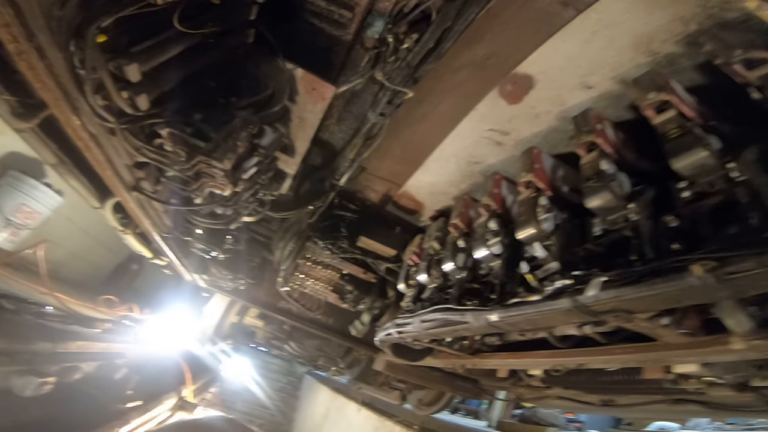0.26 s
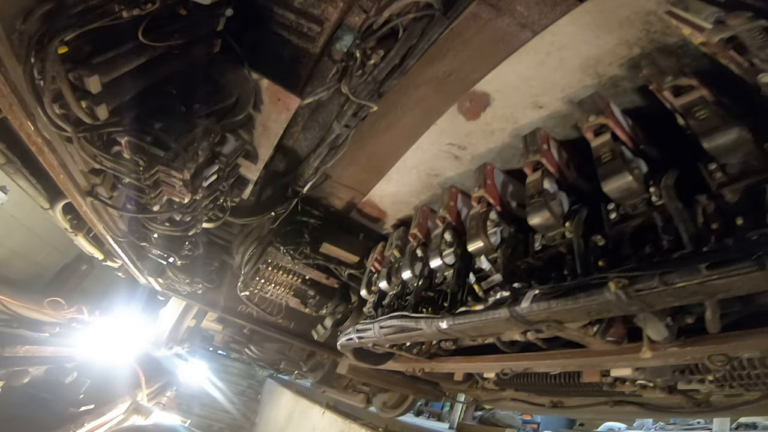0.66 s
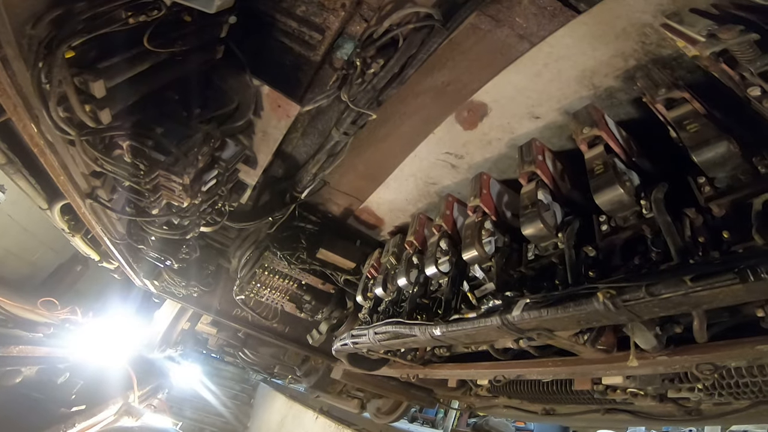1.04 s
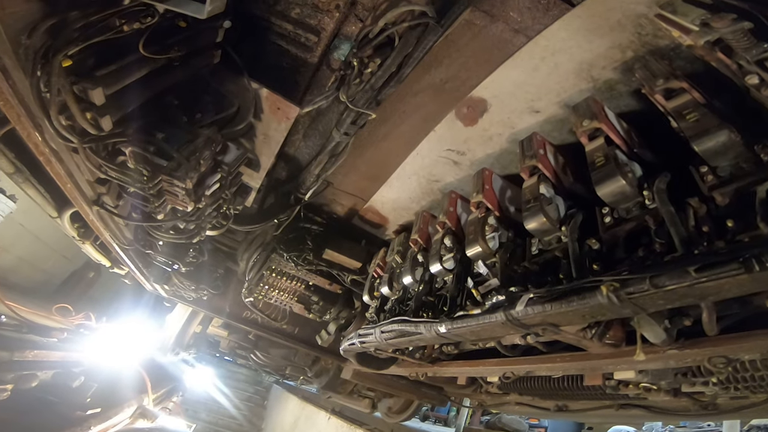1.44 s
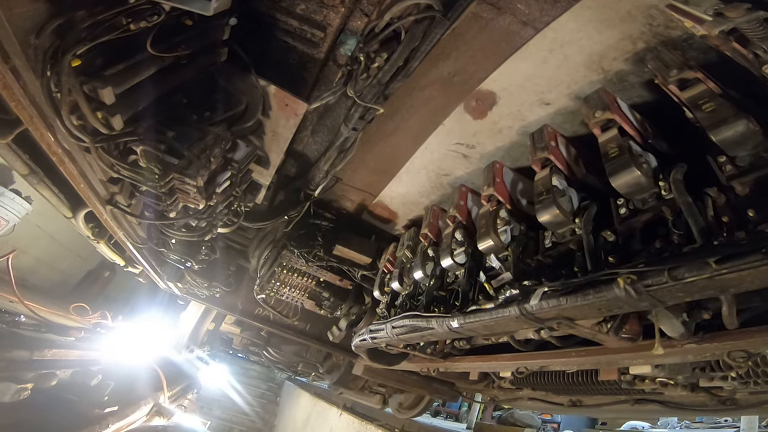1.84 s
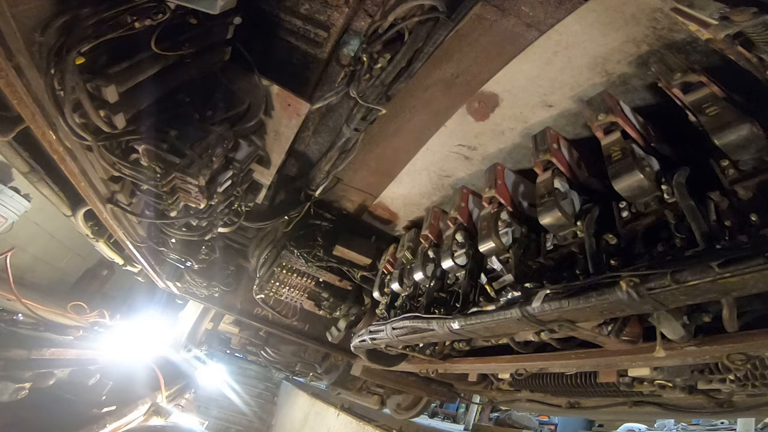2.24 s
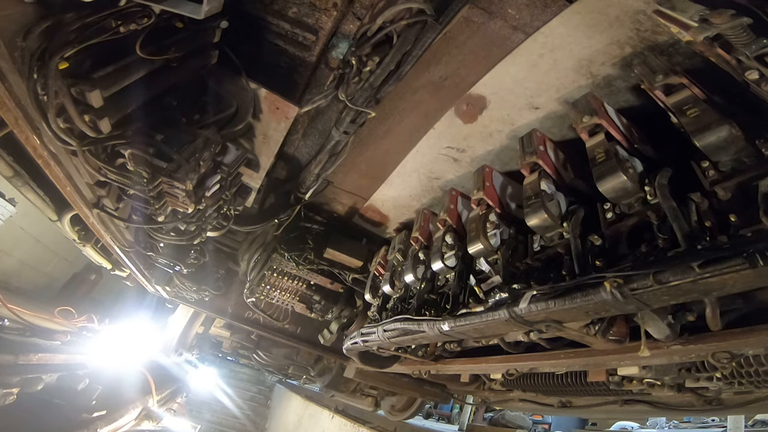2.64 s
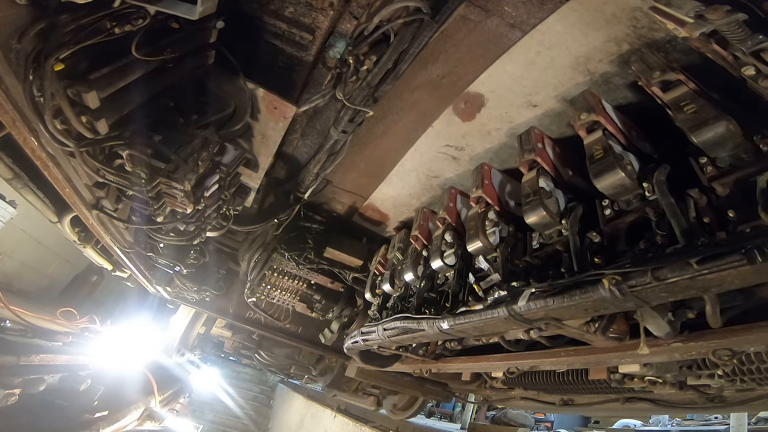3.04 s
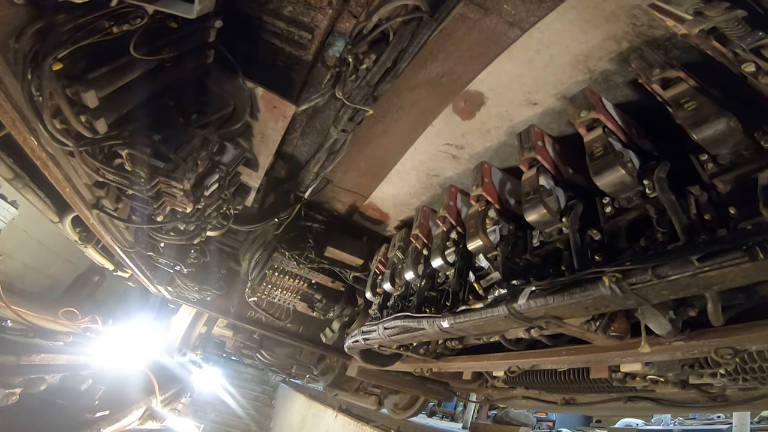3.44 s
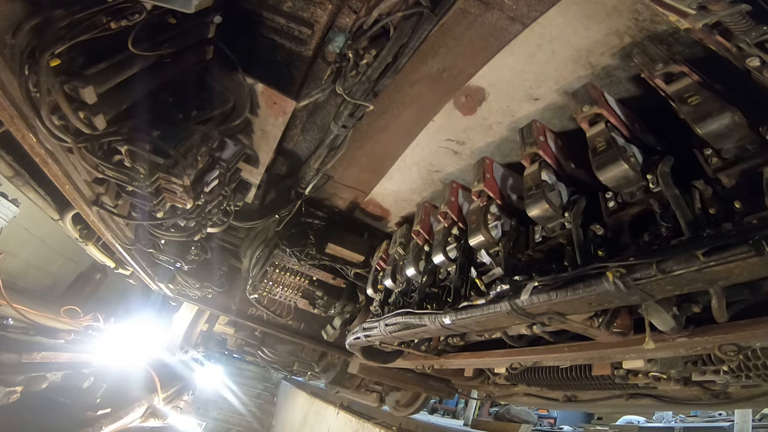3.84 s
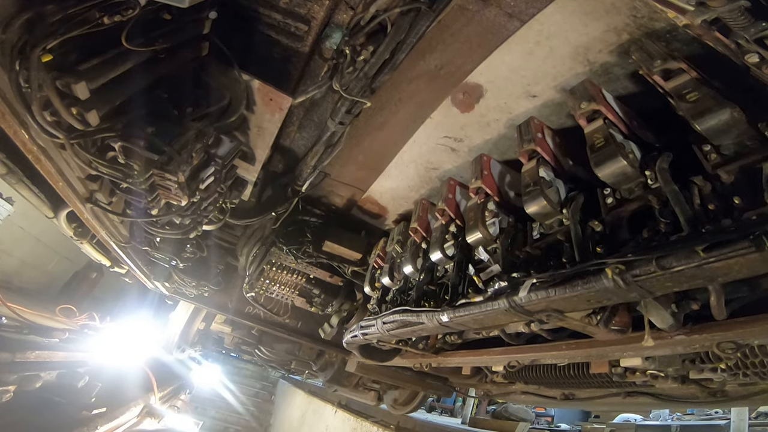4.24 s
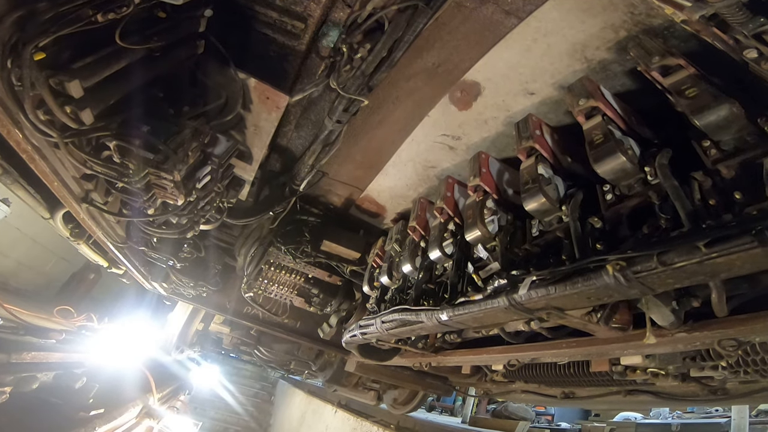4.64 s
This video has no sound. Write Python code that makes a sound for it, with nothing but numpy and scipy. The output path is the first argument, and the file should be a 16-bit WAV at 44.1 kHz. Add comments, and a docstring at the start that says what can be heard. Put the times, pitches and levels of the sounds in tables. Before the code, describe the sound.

Under a rail car, deep duct rumble continues while electrical contactors clack shut: one alone, then about half a dozen in quick succession.

```python
"""Electrical contactors in a row snap shut under a rail car over a pit: one, then a quick run.
Each closing is four blows: noisy chatter drives decaying sines of armature, contacts, bracket and frame.
Loose levers rattle as clumped noise, springs ring as a beating sine, the pit returns sparse echoes.
Ventilation is steady coloured noise; a microphone with two ports ducks after loud snaps.
"""
import sys
import numpy as np
from scipy import signal
from scipy.fft import rfft, irfft
from scipy.io import wavfile
from scipy.ndimage import uniform_filter1d

SR = 44100
rng = np.random.default_rng(int(sys.argv[2]) if len(sys.argv) > 2 else 0)


def wav_out(sig):
    """Save sig, one row per channel (or a flat mono array), as 16-bit PCM at SR to the path in sys.argv[1]."""
    wavfile.write(sys.argv[1], SR, np.round(np.clip(np.atleast_2d(sig).T, -1, 1) * 32767).astype(np.int16))


N = 215770

# Closings: (touch time [s], touch level [dB], armature [Hz], contact [Hz], low knock [dB], bracket [Hz],
#  bracket level [dB], touch rise [ms], touch chatter decay [ms], touch brightness [dB],
#  wipe re seating [dB], seating delay [ms], seating level [dB], seating armature [Hz],
#  seating contact [Hz], seating brightness [dB], seating chatter decay [ms],
#  rebound delay after seating [ms], rebound re seating [dB])
CLOSINGS = [(2.2540, -16, 2340, 7350, -2.5, 1270, 5, 0.48, 9.5, -4, -5, 12.3, -16.5, 2160, 7000, 2, 12.6, 13, -17),
            (2.8083, -12, 1910, 7450, -6, 5900, -0.5, 1.8, 8.3, 0, -6.5, 12.5, -12, 1890, 6900, -5.5, 11, 22, -11),
            (2.8914, -11.5, 2740, 7230, -11, 2360, 2.5, 0.47, 5.7, -4, -3.5, 5, -18, 2720, 7250, -5, 4.5, 13, -16),
            (2.916, -13, 2210, 6800, -6, 4830, -1, .6, 4.1, 2.5, -5, 7.3, -19, 2580, 7440, 1, 4, 4.7, -13),
            (3.148, -13.5, 2760, 6640, -12.5, 8500, -0.5, 2.2, 4.9, -1, 4, 5.4, -31, 2620, 6500, 1.5, 7.2, 8.9, -7),
            (3.1800, -13, 2620, 6500, -1, 1500, -4, 1.9, 7.8, 7.5, -6.5, 6.0, -10.5, 2010, 6000, -3.5, 7.7, 11, -15),
            (3.2654, -10, 3250, 6700, 1.5, 2460, -2.5, 0.97, 2.9, 4.5, -4, 11.7, -10.5, 3250, 5400, -0.5, 4.4, 9.2, -18)]
# Single ticks of smaller parts: (time [s], level [dB], armature [Hz], contact [Hz], brightness [dB],
#  chatter decay [ms], low knock [dB], bracket [Hz], bracket level [dB])
SMALL_TICKS = [(2.9530, -25.5, 3000, 6500, 3, 6, 10, 4500, 5),
               (2.9668, -18, 2270, 7640, 2, 8.3, -7.5, 2500, 0),
               (2.9860, -19.5, 2150, 5700, 2, 15, 15, 4220, 10.5),
               (3.003, -21, 2200, 7700, 1, 6, 10.5, 3520, -1.5),
               (3.0185, -29.5, 2210, 6800, -5.5, 6, 11, 3520, -1),
               (3.0685, -20.5, 1600, 5770, 2.5, 14, 17, 9600, 2),
               (3.0880, -37, 2190, 5760, 0, 6.7, 10, 3570, 2)]
# Shared steel frame modes: (frequency [Hz], relative level [dB], t60 [s])
FRAME_MODES = [(900, -25, 0.033), (1360, -8, 0.013), (1850, -10, 0.068), (2590, -5, 0.033),
               (2850, -9, 0.018), (3570, -10, 0.027), (6100, -8.5, .012), (6750, -7, .025),
               (7400, -7, 0.027), (7650, -9, 0.018)]
# Broadband colour of a blow: (frequency [Hz], relative density [dB])
CRACK_COLOUR = [(400, -44.5), (700, -10), (1500, -6.5), (1900, -1), (3400, 2.5), (4200, -2.5), (5200, -5),
                (6100, -1), (7700, 1), (8300, -8.5), (9000, -11), (10200, -10), (11500, -23),
                (12600, -11.5), (13400, -22), (14900, -25), (15800, -33)]
# Linkage rattle envelope: (time [s], level [dB])
RATTLE_LEVEL = [(2.812, -37), (2.85, -34), (2.88, -32.5), (2.91, -45), (2.96, -32), (3.019, -31),
                (3.05, -45), (3.09, -29), (3.13, -40), (3.2, -32.5), (3.36, -64)]
# Linkage colour: (frequency [Hz], relative density [dB])
LINKAGE_COLOUR = [(500, -32), (900, 5.5), (1500, 1), (2000, -3.5), (2270, 0.5), (2550, -6), (4300, -11.5),
                  (7000, -15), (11000, -30), (15800, -44)]
# Contact spring rings: (time [s], level before rise and beat [dB], t60 [s])
SPRING_RINGS = [(2.2548, -32, 0.054), (2.2667, -31, 0.12), (2.811, -21, 0.04)]
# Pit decay: (frequency [Hz], t60 [s])
PIT_T60 = [(800, 0.053), (2000, 0.43), (4000, 0.36), (7000, 0.38), (11000, 0.34), (16000, 0.24)]
# Pit reflection colour: (frequency [Hz], relative level [dB])
PIT_COLOUR = [(600, -3), (2000, 0), (3400, -0.5), (4800, 1), (6500, 0), (7700, -1), (10000, 4),
              (15000, -0.7)]
# Duct rumble colour: (frequency [Hz], relative density [dB])
RUMBLE_COLOUR = [(12, -42.5), (22, -25), (45, -10.5), (70, -10.5), (80, 2.5), (115, -1), (128, -6),
                 (152, -2), (175, -10), (255, -13.5), (310, -9), (335, -10), (400, -20), (450, -16.5),
                 (500, -20.5), (590, -16.5), (700, -25), (1000, -31.5), (1500, -110)]
# Air rush colour: (frequency [Hz], relative density [dB])
HISS_COLOUR = [(500, -38), (850, -3.5), (1200, -4), (2000, -10.5), (2300, -15), (3600, -21.5), (4200, -27),
               (4900, -28.5), (5600, -24.5), (7500, -25), (8200, -29.5), (11000, -42), (14500, -54),
               (15800, -55)]
# Likeness of the two ports: (frequency [Hz], correlation [-1..1])
PORT_LIKENESS = [(60, 0.99), (200, 0.94), (400, 0.8), (700, 0.26), (1200, 0.11), (2500, 0.51), (4500, 0.59),
                 (7000, 0.12), (12000, 0.24)]
# Phase between ports: (frequency [Hz], left lead [rad])
PORT_LEAD = [(0, 0), (600, -.2), (1030, 2.1), (2760, .4), (3880, .6), (5080, -.6), (7840, -1.6),
             (12000, -1.4)]
# Balance between ports: (frequency [Hz], left re right [dB])
PORT_BALANCE = [(60, 2), (120, -1.5), (240, -0.5), (480, -10.5), (950, -4), (1890, -2), (3770, -3.5),
                (7520, -2.5), (15000, 3)]

STRAY_SHARE = .06  # random pitch spread of wipe and rebound around the closing's own pitches
WIPE_AT_SHARE, WIPE_CHATTER_MS, WIPE_BRIGHT_DB = 0.43, 6, -0.5  # position as share of seating delay
SETTLE_CHATTER_MS, SETTLE_BRIGHT_DB = 11, -1
LATER_RISE_MS, TICK_RISE_MS = 2, .45  # blows after the touch; small ticks
STRIKE_RATIO, CRACK_DB = 1.1, -3.5  # firm strike re chatter envelope norm; broad crack
DETUNE_SHARE = .015  # random pitch spread of the frame modes, drawn for every blow
SPRING_HZ, SPRING_BEAT_HZ, SPRING_RISE_S = 10020, 45, 0.003
ECHO_DB, ECHO_TURN_HZ = -11.0, 5.3
RUMBLE_DB, HISS_DB = -17.5, -37
BASS_HZ, BASS_SQUEEZE = 420, .2  # share of each dB taken back
DUCK_ABOVE_DB, DUCK_SHARE, DETECTOR_FALL_DB_PER_S = -25.0, 0.37, 6.6
CLIP_KNEE, CLIP_SPAN = .55, .25
EDGE_HZ = 15900


def gain_of(db):
    """Converts decibels to an amplitude factor."""
    return 10 ** (np.asarray(db) / 20)


def evened(x):
    """Scales to rms 1."""
    return x / np.sqrt(np.mean(x ** 2) + 1e-20)


def read(points, hz):
    """Interpolates linearly on a log-frequency axis."""
    f, value = np.transpose(points)
    return np.interp(np.log(hz + 1), np.log(f + 1), value)


def paired(x):
    """Mixes two unrelated signals to the port correlation of a spread source."""
    same = np.clip(read(PORT_LIKENESS, np.fft.rfftfreq(x.shape[1], 1 / SR)), -1, 1)
    a, b = rfft(x)
    right = same * a + np.sqrt(1 - same ** 2) * b
    return irfft(np.array([a, right]), x.shape[1])


def contactors():
    """Sums all closings and small ticks, each blow at its moment."""
    out = np.zeros((2, N))
    blows = [row for closing in CLOSINGS for row in snap(*closing)]
    blows += [(*tick, TICK_RISE_MS) for tick in SMALL_TICKS]
    for time_s, *row in blows:
        sound = blow(*row)
        start = round(time_s * SR)
        out[:, start:start + sound.shape[1]] += sound
    return out


def snap(touch_s, touch_db, armature_hz, contact_hz, knock_db, bracket_hz, bracket_db, rise_ms,
         touch_ms, touch_bright_db, wipe_db, delay_ms, seat_db, seat_hz, seat_contact_hz,
         seat_bright_db, seat_ms, settle_ms, settle_db):
    """One closing: contacts touch, wipe (slide), seat, then rebound once."""
    pitches_hz = np.array([[armature_hz, seat_hz], [contact_hz, seat_contact_hz]])
    armature, contact = pitches_hz * (1 + STRAY_SHARE * rng.standard_normal((2, 2)))
    seat_s = touch_s + delay_ms / 1000
    settle_s = seat_s + settle_ms / 1000
    wipe_s = touch_s + WIPE_AT_SHARE * (seat_s - touch_s)
    mount = knock_db, bracket_hz, bracket_db
    return [(touch_s, touch_db, armature_hz, contact_hz, touch_bright_db, touch_ms, *mount, rise_ms),
            (wipe_s, seat_db + wipe_db, armature[0], contact[0],
             WIPE_BRIGHT_DB, WIPE_CHATTER_MS, *mount, LATER_RISE_MS),
            (seat_s, seat_db, seat_hz, seat_contact_hz, seat_bright_db, seat_ms, *mount, LATER_RISE_MS),
            (settle_s, seat_db + settle_db, armature[1], contact[1],
             SETTLE_BRIGHT_DB, SETTLE_CHATTER_MS, *mount, LATER_RISE_MS)]


def blow(db, armature_hz, contact_hz, bright_db, chatter_ms, knock_db, bracket_hz, bracket_db, rise_ms):
    """Dense micro-impacts, rising fast and dying, ring armature, contacts, bracket and frame."""
    t = np.arange(8192) / SR
    rise = 1 - np.exp(-1000 * t / max(rise_ms, .2))
    shape = rise * np.exp(-1000 * t / max(chatter_ms, 1))
    clumps = gain_of(2.2 * evened(uniform_filter1d(rng.standard_normal(len(t)), size=50)))
    # Axis 0: one patter cracks, the other drives the rings; axis 1: two signals to pair.
    chatter = rng.standard_normal((2, 2, len(t))) * clumps * shape
    chatter[1, :, shape.argmax()] += STRIKE_RATIO * np.linalg.norm(shape)
    crack, clank = rfft(chatter)

    hz = np.fft.rfftfreq(len(t), 1 / SR)
    treble = gain_of(bright_db / (1 + (4500 / (hz + 1)) ** 6))  # shelf above 4500 Hz
    knock = gain_of(knock_db / (1 + (hz / (0.82 * armature_hz)) ** 6))  # shelf below the armature
    own = gain_of(7.0) * ring(armature_hz, .013, t)
    own = own + gain_of(6.0) * ring(contact_hz, .006, t)
    own = own + gain_of(bracket_db) * ring(bracket_hz, .009, t)
    rings = own + gain_of(2.5) * frame(t)

    body = gain_of(CRACK_DB) * crack * evened(gain_of(read(CRACK_COLOUR, hz))) + clank * rfft(rings)
    sound = paired(irfft(treble * knock * body, len(t)))
    # Same force whatever the patter drawn.
    strength = np.linalg.norm(shape) / np.linalg.norm(sound) / shape.max()
    fade_out = np.minimum((t[-1] - t) / .05, 1)
    return gain_of(db) * strength * sound * fade_out


def frame(t):
    """Steel frame modes; every blow meets another spot, so mode levels vary, and pitches stray slightly."""
    spots_db = rng.normal(0, 1.8, len(FRAME_MODES))
    out = 0
    for (mode_hz, level_db, t60), spot_db in zip(FRAME_MODES, spots_db):
        out = out + gain_of(level_db + spot_db) * ring(mode_hz * rng.normal(1, DETUNE_SHARE), t60, t)
    return out


def ring(hz, t60, t):
    """Decaying sine scaled so that its energy hardly depends on t60."""
    return np.sin(2 * np.pi * hz * t) * gain_of(-60 * t / t60) / np.sqrt(t60 * SR)


def linkage():
    """Loose levers rattle densely and unevenly: clumped, coloured noise."""
    time_s, level_db = np.transpose(RATTLE_LEVEL)
    t = np.arange(N) / SR
    noise = rng.standard_normal((2, N))
    clumps = gain_of(3.2 * evened(uniform_filter1d(rng.standard_normal(N), size=60)))
    colour = gain_of(read(LINKAGE_COLOUR, np.fft.rfftfreq(N, 1 / SR)))
    coloured = irfft(rfft(noise * clumps) * colour, N)
    active = (t > time_s[0]) & (t < time_s[-1])
    return evened(paired(coloured)) * gain_of(np.interp(t, time_s, level_db)) * active


def springs():
    """Contact springs ring thinly after some blows: a decaying, beating sine."""
    out, t = np.zeros((2, N)), np.arange(N) / SR
    for time_s, db, t60 in SPRING_RINGS:
        since = np.maximum(t - time_s, 0)
        phase = rng.uniform(0, 2 * np.pi)
        beat = 1 + .4 * np.cos(2 * np.pi * SPRING_BEAT_HZ * since)
        envelope = gain_of(db - 60 * since / t60) * (1 - np.exp(-since / SPRING_RISE_S))
        out += envelope * beat * np.sin(2 * np.pi * SPRING_HZ * t + phase)
    return out


def pit(x):
    """Sparse echoes of random sign off car floor and pit walls, each band with its own decay."""
    taps = np.zeros((2, SR // 2))
    at = np.arange(200, SR // 2 - 20, 20)
    at = at + rng.integers(0, 20, (2, len(at)))
    np.put_along_axis(taps, at, rng.choice([-1., 1.], at.shape), 1)
    hz, t, z = signal.stft(paired(taps), SR, nperseg=256)
    decay_db = read(PIT_COLOUR, hz)[:, None] - 60 * t / read(PIT_T60, hz)[:, None]
    tail = signal.istft(z * gain_of(decay_db), SR, nperseg=256)[1]
    return signal.fftconvolve(x, tail / np.linalg.norm(tail[0]), axes=1)[:, :N]


def ventilation():
    """Deep duct rumble plus a thin, even rush of air."""
    rumble = gain_of(RUMBLE_DB) * air(RUMBLE_COLOUR, patchy_db=.2, swell_db=.2, size=4096)
    return rumble + gain_of(HISS_DB) * air(HISS_COLOUR, patchy_db=.9, swell_db=.35, size=512)


def air(spectrum, patchy_db, swell_db, size):
    """Coloured noise with drifting time-frequency patches and a common swell."""
    hop = size // 4
    frames, hz = N // hop + 5, np.fft.rfftfreq(size, 1 / SR)
    a, b, c, d, patches = rng.standard_normal((frames, len(hz), 5)).T
    patches = evened(uniform_filter1d(uniform_filter1d(patches, size=10, axis=0), size=8, axis=1))
    t = np.arange(frames) * hop / SR
    swell = evened(sum(np.sin(2 * np.pi * (f * t + rng.random())) / np.sqrt(f)
                       for f in np.geomspace(.3, 5, num=20)))
    level_db = read(spectrum, hz)[:, None] + patchy_db * patches + swell_db * swell
    z = np.array([a + 1j * b, c + 1j * d]) * gain_of(level_db)
    noise = signal.istft(z, nperseg=size, noverlap=size - hop)[1][:, :N]
    return evened(paired(noise))


def scene():
    """Contactors and linkage with pit echo, plus springs and ventilation."""
    gear = contactors() + linkage()
    # Turning between two random echo patterns over time, so the tail's colour keeps shifting.
    turn = 2 * np.pi * ECHO_TURN_HZ * np.arange(N) / SR
    echo = pit(gear * np.cos(turn)) + pit(gear * np.sin(turn))
    return gear + gain_of(ECHO_DB) * echo + springs() + ventilation()


def squeezed(x):
    """Quick bass compressor: turns surges down and sags up, keeping the bass rms."""
    bass = irfft(rfft(x) / (1 + (np.fft.rfftfreq(N, 1 / SR) / BASS_HZ) ** 4), N)
    power = uniform_filter1d(uniform_filter1d((bass ** 2).mean(0), size=300), size=300) + 1e-4
    even = bass / power ** (BASS_SQUEEZE / 2)
    return x - bass + even * np.linalg.norm(bass) / np.linalg.norm(even)


def record(dry):
    """Port phase and balance, bass compression, treble-led ducking, soft overload, band limit."""
    hz = np.fft.rfftfreq(N, 1 / SR)
    shift = gain_of(read(PORT_BALANCE, hz) / 2) * np.exp(.5j * read(PORT_LEAD, hz))
    ports = irfft(rfft(dry) * np.array([shift, 1 / shift]), N)

    # Differencing weights the detector to treble; peaks hold, then fall at a set rate.
    treble_power = uniform_filter1d((np.diff(ports, prepend=0) ** 2).mean(0), size=900)
    power_db = 10 * np.log10(abs(treble_power) + 1e-12)
    fall_db = np.arange(N) * DETECTOR_FALL_DB_PER_S / SR
    held_db = np.maximum.accumulate(power_db + fall_db) - fall_db
    over_db = np.maximum(held_db - DUCK_ABOVE_DB, 0)
    ducked = squeezed(ports) / gain_of(DUCK_SHARE * uniform_filter1d(over_db, size=400))

    over = np.maximum(abs(ducked) - CLIP_KNEE, 0)
    rounded = ducked - np.sign(ducked) * (over - CLIP_SPAN * np.tanh(over / CLIP_SPAN))
    lowpass = signal.firwin(511, EDGE_HZ, window=("kaiser", 9), fs=SR)
    return signal.oaconvolve(rounded, lowpass[None], "same")


dry = scene()
out = record(dry)
wav_out(out)
```